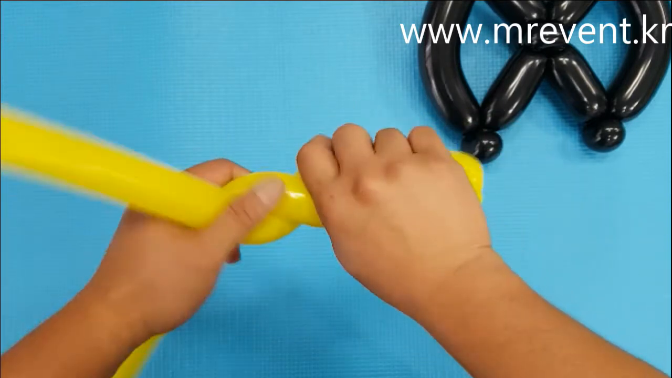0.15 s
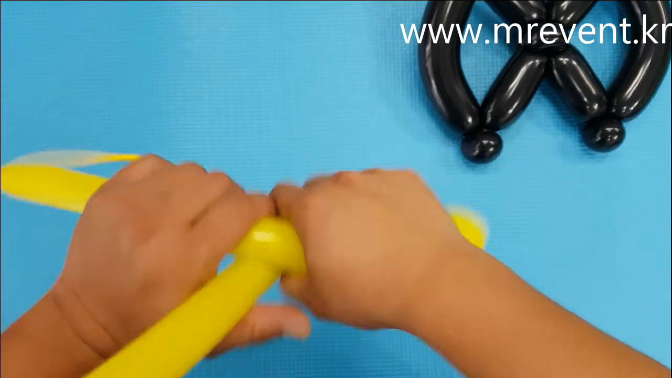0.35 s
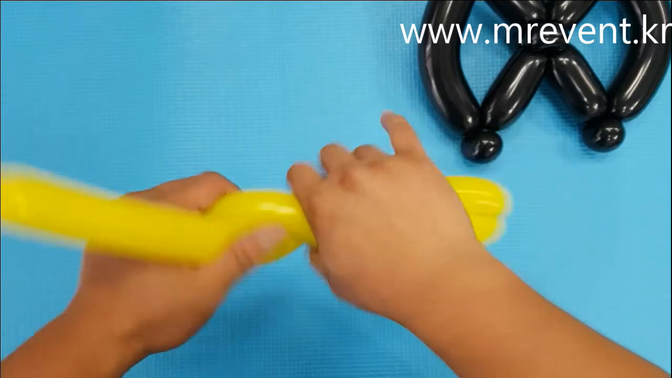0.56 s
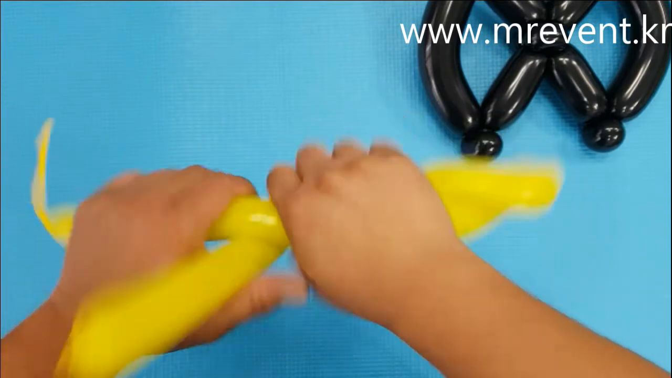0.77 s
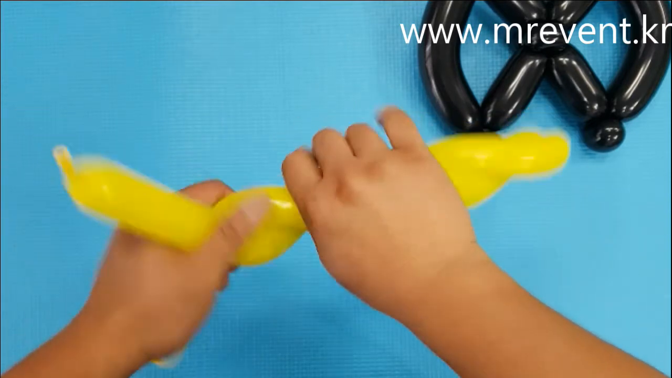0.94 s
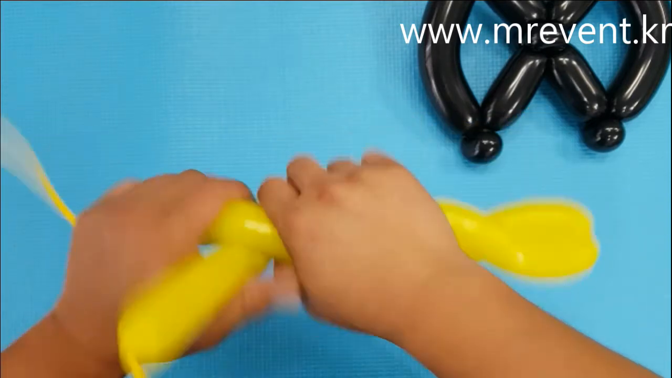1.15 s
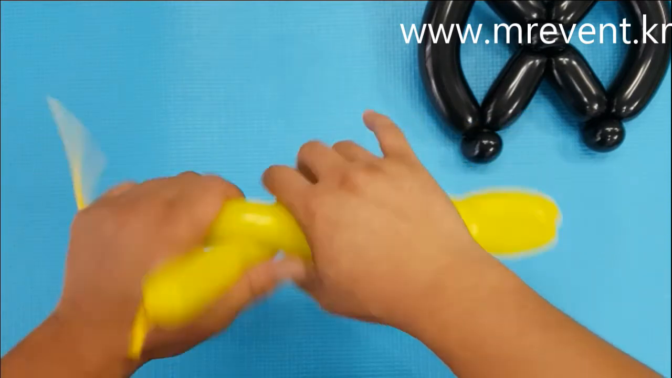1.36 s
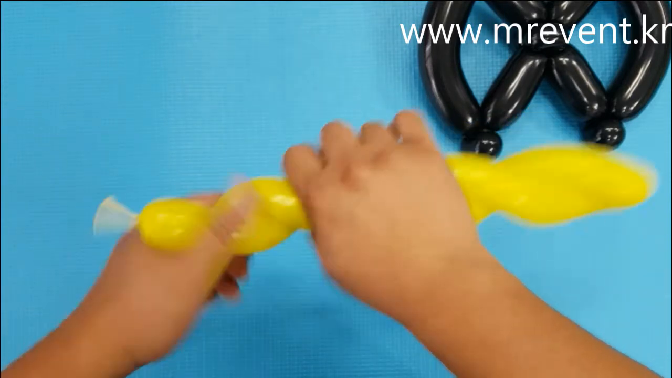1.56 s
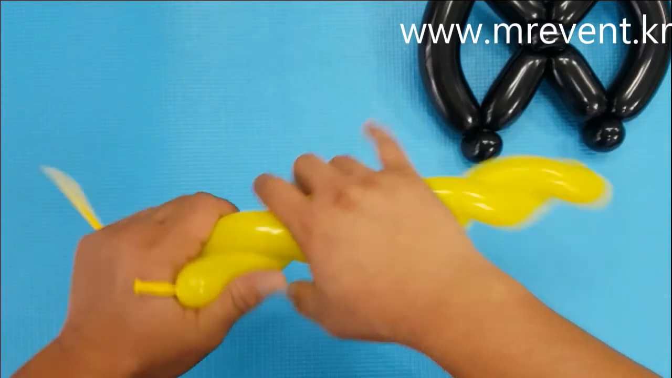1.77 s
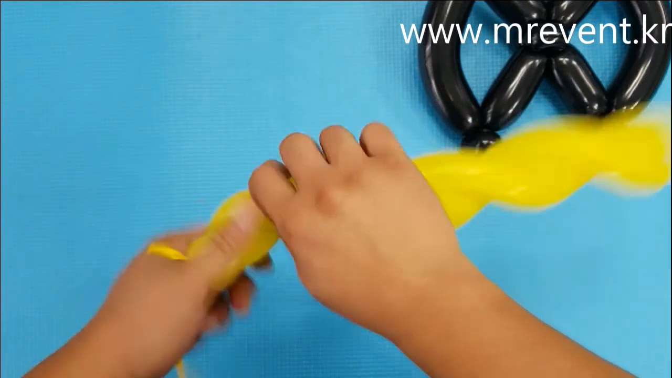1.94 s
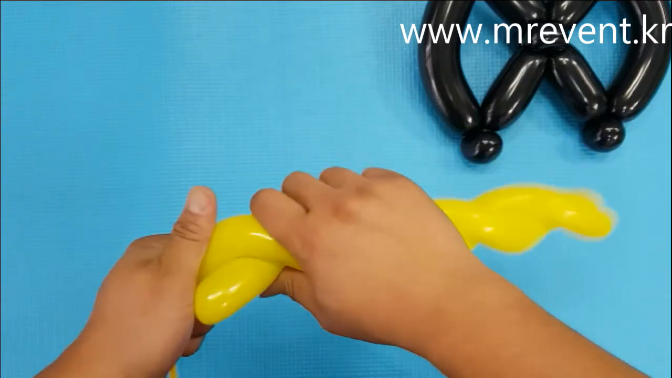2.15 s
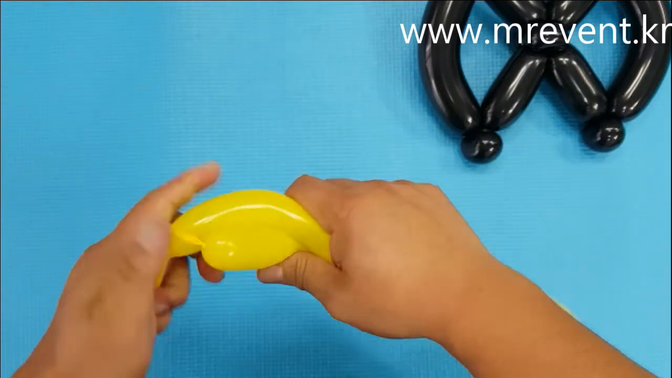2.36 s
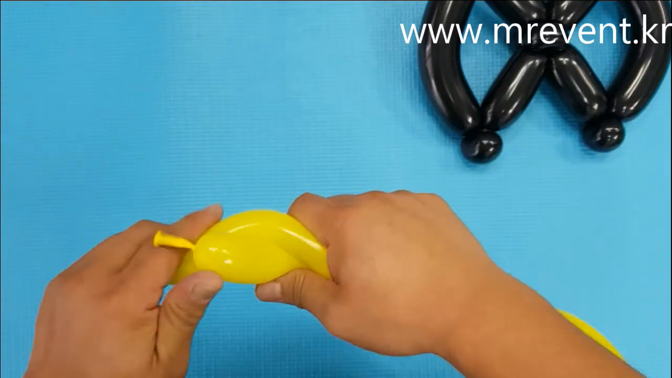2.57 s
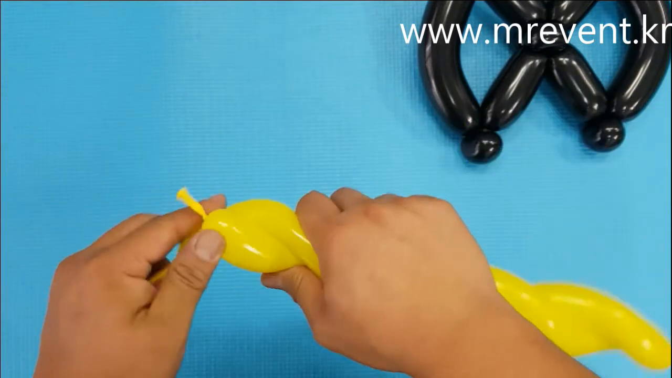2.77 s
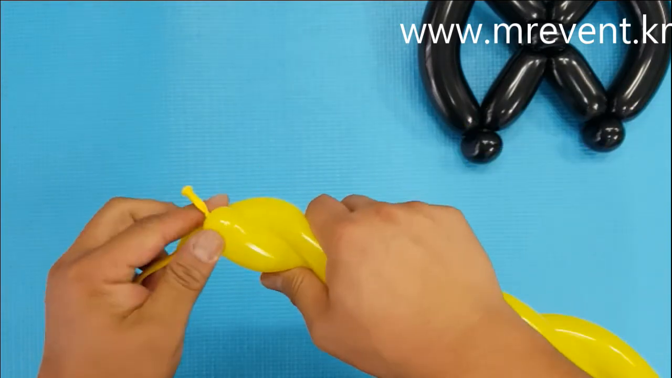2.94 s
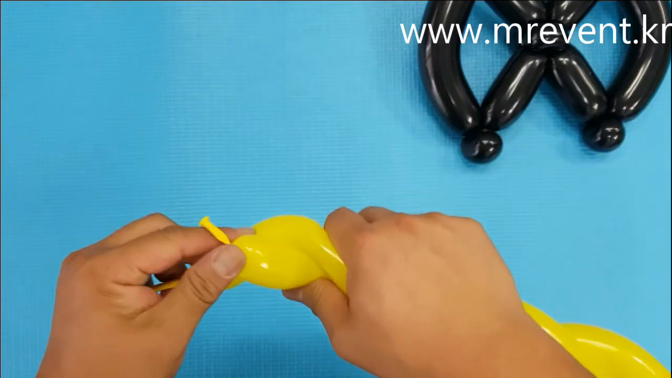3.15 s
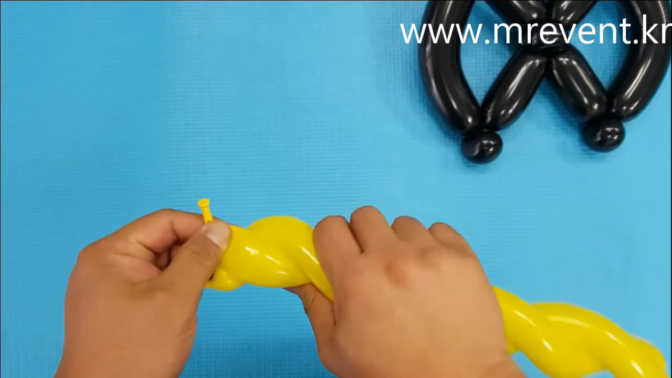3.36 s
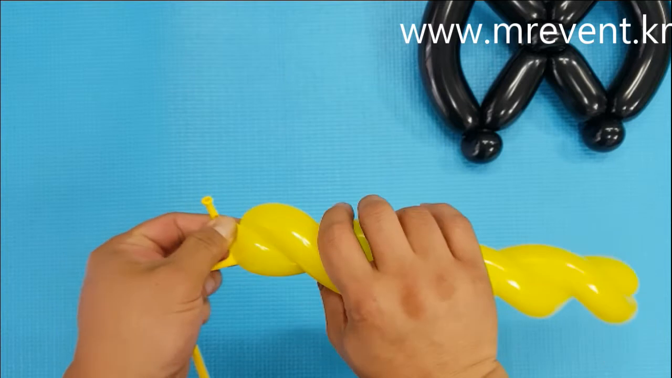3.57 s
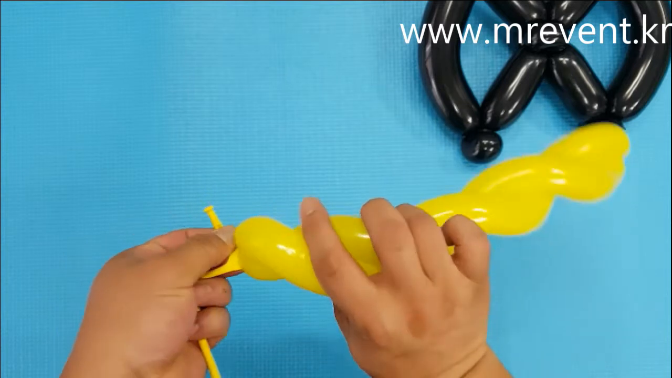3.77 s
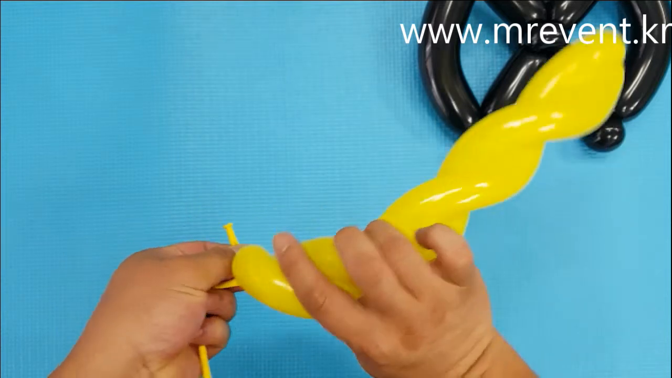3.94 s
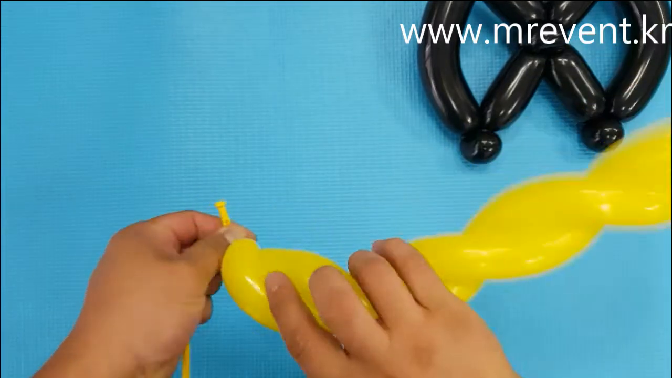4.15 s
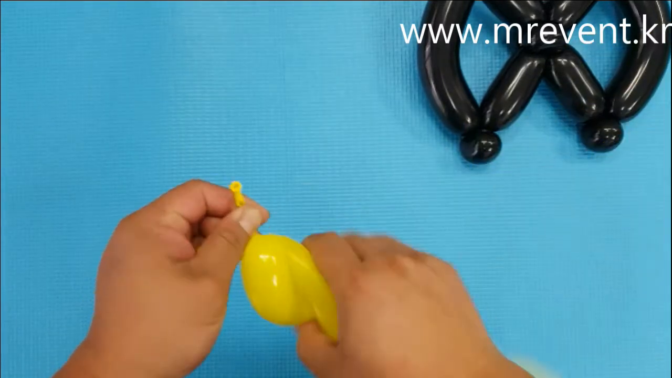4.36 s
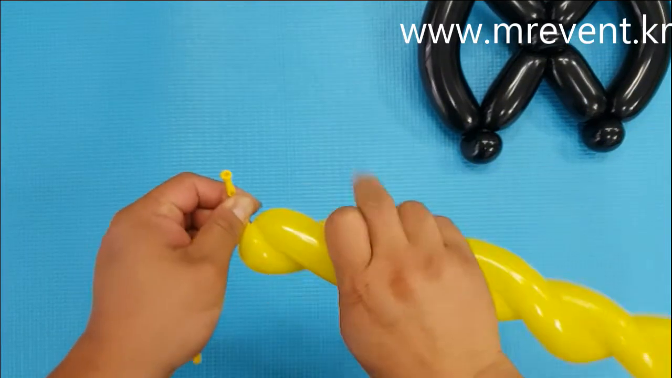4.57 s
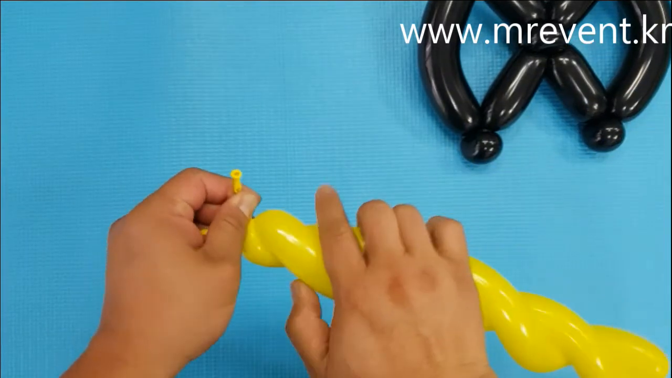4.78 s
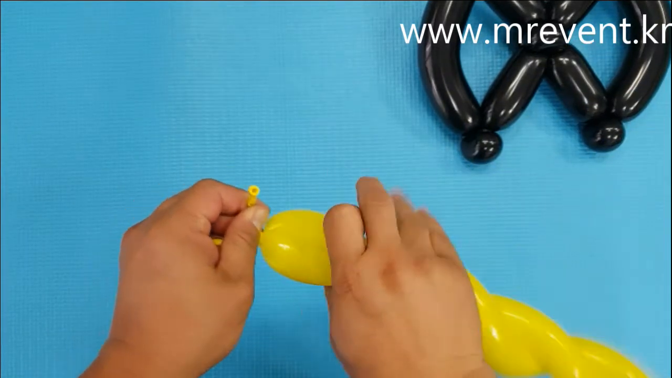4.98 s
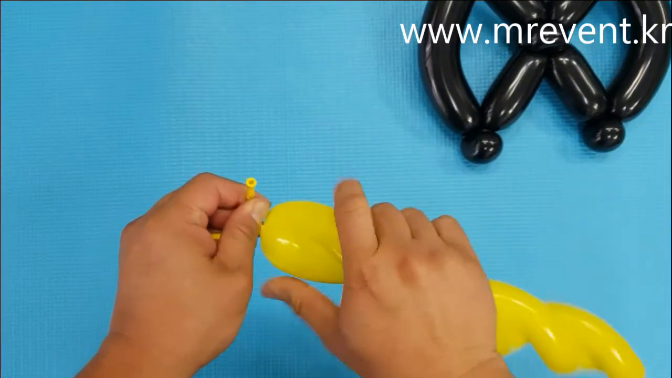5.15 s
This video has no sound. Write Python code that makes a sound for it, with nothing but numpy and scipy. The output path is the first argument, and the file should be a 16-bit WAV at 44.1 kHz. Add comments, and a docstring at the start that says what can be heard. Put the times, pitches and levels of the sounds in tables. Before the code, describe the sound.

A busy run of rubbery creaks, snaps and very short squeals opens the sound as a balloon is twisted against itself. Fingers slide and fumble softly between the twists. The second half is sparser and quieter, with gentle strokes on the latex, a few ticks and a brief stuttering creak. The microphone is close, and the room is nearly dry, with a faint low hum.

```python
"""A long latex balloon, twisted round itself by two hands, close to a stereo microphone in a quiet room.
The skin sticks and slips: single slips tick and crack, slow runs of them ratchet, fast runs creak,
and when they lock into step they squeal. Between twists the fingers slide and fumble, and the air
in the tube booms when let go. Behind it lie a short room tail, room tone and mains hum."""
import sys
import numpy as np
from scipy import signal
from scipy.fft import rfft, irfft, next_fast_len
from scipy.io import wavfile

SR = 44100
rng = np.random.default_rng(int(sys.argv[2]) if len(sys.argv) > 2 else 0)


def int16_out(signal):
    """Quantize to a 16-bit WAV file."""
    q = np.round(np.clip(np.atleast_2d(signal).T, -1, 1) * 32767)
    wavfile.write(sys.argv[1], SR, q.astype(np.int16))


N = 230025
TIME = np.arange(N) / SR

# Noise colours. Each row: frequency in Hz, relative level in dB.
ROOM_COLOUR = [(24, 1), (40, -7), (100, -5), (200, -7.5), (1500, -26), (5000, -44), (16000, -48)]
KNOCK_COLOUR = [(90, 0), (170, -2.5), (270, -1), (430, 3), (700, -11), (1200, -11.5)]
RUB_COLOUR = [(250, -48), (650, -3), (950, 4.5), (1300, -3.5), (1750, 0), (2300, -11), (3200, -22)]
SKIN_COLOUR = [(150, -42), (280, 2.5), (550, -6), (830, 9.5), (1400, -9.5), (1750, 4.5), (2300, -4.5),
               (3200, -54)]
CRACK_COLOUR = [(1400, -3), (2300, 4.5), (3200, -0.5), (4500, -6), (7000, -8.5), (9200, -15.5),
                (11000, -12), (16000, -13.5)]
# How alike left and right are at the microphone. Each row: frequency in Hz, correlation.
STEREO_LIKENESS = [(300, 0.94), (1000, 0.92), (2000, 0.67), (4000, 0.41), (8000, 0.041), (16000, 0)]
# Air booming in the tube. Each row: start in seconds, level in dB, pitch in Hz, 60 dB decay in seconds.
AIR_BOOMS = [(0.625, -18, 220, 0.086), (1.004, -21, 202, 0.099), (1.75, -25.5, 186, 0.1)]
# Fingers shifting their grip. Each row: time in seconds, relative level in dB.
GRIP_LEVELS = [(0.0, -38), (0.42, -43), (1.13, -40.5), (1.58, -57), (2.09, -49), (3.72, -52), (4.0, -33),
               (4.37, -43.5), (4.85, -38), (5.22, -52)]
# Fingers sliding on the skin. Each row: time in seconds, relative rub and hiss levels in dB.
SLIDE_LEVELS = [(0.0, -28.5, -36.5), (0.09, -23, -32), (0.33, -51, -47.5), (0.62, -49, -39.5),
                (0.74, -34, -51.5), (1.2, -48, -42.5), (1.38, -43.5, -48.5), (1.95, -47.5, -47),
                (2.15, -35.5, -40), (2.41, -42, -44.5), (2.56, -39, -42.5), (2.8, -43, -46),
                (3.22, -47, -56), (3.56, -38.5, -44.5), (3.79, -39, -55), (3.97, -30.5, -39.5),
                (4.21, -46.5, -46.5), (4.43, -46.5, -52.5), (4.77, -40, -39), (5.22, -42, -50.5)]
# Soft finger strokes. Each row: middle and length in seconds, level in dB.
FINGER_STROKES = [(0.38, 0.041, -32), (.565, 0.075, -39), (0.763, 0.08, -31.5), (1.184, 0.12, -27),
                  (2.262, 0.096, -26.5), (2.416, 0.051, -26), (2.77, 0.059, -30), (3.415, 0.2, -36),
                  (3.676, 0.034, -36.5), (3.809, 0.13, -32.5), (4.46, 0.03, -33.5), (4.532, 0.056, -36),
                  (4.676, 0.08, -28), (4.97, 0.02, -28.5), (5.121, 0.05, -35.5)]
# Squeals. Each row: start and end in seconds, first and last pitch in Hz, bend (under 1 glides early,
# over 1 late), first and last level in dB, roughness from 0 to 1, overtone lift in dB.
SKIN_SQUEALS = [(0.036, 0.05, 1080, 1200, 0.93, -12.5, -14, 0.52, 3),
                (.208, 0.213, 1660, 1600, 1, -23, -9.5, 0.1, -4),
                (0.307, .342, 345, 378, 2.6, -17.5, -16.5, 0.11, -3.5),
                (.820, 0.867, 882, 1245, 0.41, -12.5, -19.5, 0.06, 5.5),
                (1.195, 1.212, 1317, 1033, 0.83, -10.5, -15.5, 0.15, -1),
                (1.555, 1.610, 1155, 1608, 2.96, -12.5, -11, 0.17, 0),
                (1.936, 1.955, 1483, 1515, 0.72, -15, -4.5, 0.23, 3.5),
                (1.955, 1.995, 840, 620, 2.04, -15, -19, 0, -23),
                (2.330, 2.368, 861, 908, 1.47, -24.5, -29, 0.13, 10),
                (2.365, 2.386, 898, 864, 1.55, -14.5, -16.5, 0.29, 3.5),
                (2.539, 2.587, 332.8, 403, 1.24, -29, -36, 0.17, 11),
                (4.756, 4.767, 424, 357, 1.5, -11, -12.5, 0.57, -11)]
# A squeal's overtones. Each row: frequency in Hz, relative level in dB.
SQUEAL_OVERTONES = [(700, -12), (1200, -7), (2200, -14.5), (3400, -17.5), (5000, -24), (9000, -31),
                    (15000, -34)]
# One creak for each push of the hands. Each row: start and end in seconds, level in dB, pitch in Hz.
SKIN_CREAKS = [(0.027, 0.161, -19.5, 1275), (0.171, 0.241, -28.5, 1240), (0.4, 0.423, -27.5, 1140),
               (.508, 0.539, -25.5, 1100), (0.591, 0.601, -24, 1200), (0.624, 0.635, -24.5, 1720),
               (0.895, 0.925, -21, 1110), (0.93, 0.987, -25.5, 1220), (1.192, 1.223, -21, 1210),
               (1.244, 1.281, -15.5, 1270), (1.282, 1.35, -27, 1290), (1.374, 1.384, -25.5, 1340),
               (1.956, 2.018, -17, 1290), (2.012, 2.068, -22.5, 1250), (2.155, 2.172, -24.5, 1000),
               (2.294, 2.369, -23, 985), (2.543, 2.573, -22.5, 1420), (2.599, 2.626, -27.5, 880),
               (3.984, 4.048, -28, 1422), (4.088, 4.114, -27, 1440)]
# Slow stick-slip. Each row: start and end in seconds, first and last rate in ticks per second,
# relative ring and crack levels in dB.
SKIN_RATCHETS = [(2.216, 2.261, 92, 165, -22, -16), (2.859, 2.924, 113, 102, -39.5, -34.5),
                 (3.009, 3.038, 79, 69, -25.5, -25.5), (3.865, 3.98, 68, 65, -17, -25.5)]
# The loudest single slips. Each row: start in seconds, relative ring and crack levels in dB.
LONE_SLIPS = [(0.006, -18, -24), (0.083, -2.5, -15), (0.1, -2, -19), (0.155, -5, -20), (0.412, -7, -18.5),
              (0.626, -16.5, -25), (0.802, -4, -18.5), (0.901, -13, -15.5), (0.951, -8, -20.5),
              (1.008, -8.5, -17.5), (1.195, -13, -19.5), (1.277, -15, -11.5), (1.345, -8, -19.5),
              (1.666, -11, -24), (1.749, -17, -20.5), (2.031, -8, -30), (2.2, -34, -23),
              (2.267, -17, -18.5), (2.945, -17.5, -27), (3.142, -19.5, -36.5), (4.022, -14, -38),
              (4.087, -23, -31), (4.292, -27.5, -25), (4.677, -11.5, -30.5), (4.757, -4, -29),
              (4.884, -21.5, -30.5)]

RING_SPREAD = 0.11  # spread of log pitch: each slip finds the skin at a slightly different tension
LEFT_RIGHT = np.array([[1], [-1]])


def from_db(db):
    return 10 ** (np.asarray(db) / 20)


def unit_rms(x):
    return x / np.sqrt(np.mean(x ** 2) + 1e-20)


def at_hz(points, hz):
    """A table read on a log-frequency axis."""
    knots, values = np.transpose(points)
    return np.interp(np.log(hz + 1), np.log(knots), values)


def drift(per_s):
    """A random wander of rms 1 that turns about per_s times a second."""
    knots = rng.standard_normal(N // 8)
    return unit_rms(np.interp(TIME * per_s, np.arange(len(knots)), knots))


def noise(colour):
    """Stereo noise of rms 1 that falls away outside its colour; left and right part in the treble."""
    size = next_fast_len(N)
    hz = np.arange(size // 2 + 1) * SR / size + 1e-3
    mid, side = rfft(rng.standard_normal((2, size)))
    alike = at_hz(STEREO_LIKENESS, hz)
    stereo = np.sqrt(1 + alike) * mid + np.sqrt(1 - alike) * side * LEFT_RIGHT
    roll_off = (1 + (colour[0][0] / hz) ** 2) * (1 + (hz / colour[-1][0] / 2) ** 4)
    return unit_rms(irfft(from_db(at_hz(colour, hz)) / roll_off * stereo, size)[:, :N])


def add(out, start_s, sound):
    i = int(np.clip(start_s * SR, 0, N - 1))
    out[..., i:i + sound.shape[-1]] += sound[..., :N - i]


def background():
    """The quiet room: low room tone and a slightly wavering mains hum."""
    room_tone = from_db(-47) * noise(ROOM_COLOUR)
    hum = from_db(-44 + 0.53 * drift(6.6)) * np.sin(2 * np.pi * 120 * TIME)
    return room_tone + hum


def room(direct, t60_s, wet_db):
    """A short diffuse tail from the table and the walls reaches the microphone 3 ms late."""
    t = TIME[:SR // 2]
    diffuse = noise([(100, -4.5), (1500, -3.1), (5000, -0.9), (16000, -1)])[:, :len(t)]
    tail = unit_rms(diffuse * from_db(-60 * t / t60_s) * (t > 0.003)) / np.sqrt(len(t))
    return direct + from_db(wet_db) * signal.fftconvolve(direct, tail, axes=1)[:, :N]


def slips(times, ring_db, crack_db, pitch_hz, swell_s, crack_s, spread):
    """Each slip rings the skin and cracks. The motion holds left, right, ring power and crack power."""
    motion, t = np.zeros((4, N)), TIME[:int(0.015 * SR)]
    swell, snap = t / swell_s * np.exp(1 - t / swell_s), np.exp(-t / crack_s)
    chance = rng.standard_normal((len(times), 3))
    for start, ring, crack, (detune, side, sign) in zip(times, from_db(ring_db), from_db(crack_db), chance):
        phase = 2 * np.pi * pitch_hz * np.exp(spread * detune) * t + 0.3 * side * LEFT_RIGHT
        tone = np.sqrt(2) * np.sign(sign) * ring * swell * np.sin(phase)
        add(motion, start, np.vstack([tone, (ring * swell) ** 2, (crack * snap) ** 2]))
    return motion


def slip_run(start, end, per_s, uneven_db, **slip_shape):
    """Stress builds and lets go at uneven intervals; ring and crack each have mean power 1."""
    gap, size, sharpness = rng.standard_normal((N // 40, 3)).T
    times = np.cumsum(np.exp(0.5 * gap)) / per_s
    times = times - times[0] + start
    times = times[times < end]
    size_db = uneven_db * np.clip(size[:len(times)], -2, 1.5)
    run = slips(times, size_db, size_db + 2 * sharpness[:len(times)], **slip_shape)
    ring, crack = run[2:].sum(axis=1) / ((end - start) * SR)
    return run / np.array([[np.sqrt(ring)], [np.sqrt(ring)], [ring], [crack]])


def pressed(run, ring_db, crack_db):
    """A run of slips brought to its strength."""
    ring, crack = from_db(ring_db), from_db(crack_db)
    return np.array([run[0] * ring, run[1] * ring, run[2] * ring ** 2, run[3] * crack ** 2])


def skin(motion, colour, scatter):
    """Part of each ring scatters into the many modes of the skin; the crack is broad treble."""
    tone, ring_power, crack_power = motion[:2], motion[2], motion[3]
    body = np.sqrt(1 - scatter) * tone + np.sqrt(scatter * ring_power) * noise(colour)
    return body + np.sqrt(crack_power) * noise(CRACK_COLOUR) * from_db(0.4 * LEFT_RIGHT)


def booms():
    """A sudden release sets the enclosed air ringing; it swells over the first cycle."""
    out, t = np.zeros(N), TIME[:SR // 2]
    for start, db, hz, t60_s in AIR_BOOMS:
        envelope = from_db(db - 60 * t / t60_s) * np.minimum(hz * t, 1)
        add(out, start, envelope * np.sin(2 * np.pi * hz * t))
    return out


def fumbling():
    """Fingers shift their grip with soft, dull knocks."""
    grip_db = np.interp(TIME, *np.transpose(GRIP_LEVELS))
    return from_db(grip_db - 1.5 + 5.5 * drift(70)) * noise(KNOCK_COLOUR)


def sliding(fade_db_per_s=238):
    """Light contact gives a patter of tiny slips; it also rises with each creak and trails after it."""
    times, *levels = np.transpose(SLIDE_LEVELS)
    rub_db, hiss_db = [np.interp(TIME, times, db) for db in levels]
    trails = [np.where(TIME < start, -np.inf, db - fade_db_per_s * np.maximum(TIME - end, 0))
              for start, end, db, _ in SKIN_CREAKS]
    trail_db = np.max(trails, axis=0) - 11.5
    run = slip_run(0, N / SR, per_s=170, uneven_db=4,
                   pitch_hz=1100, swell_s=0.0017, crack_s=0.018, spread=RING_SPREAD)
    motion = pressed(run, np.maximum(rub_db - 1, trail_db), np.maximum(hiss_db + 1.5, trail_db - 1.5))
    return skin(motion, RUB_COLOUR, scatter=0.9)


def strokes():
    """A finger speeds up and slows again; its tiny slips ring the skin softly near one pitch."""
    speed = sum(from_db(db) * np.cos(np.pi * np.clip((TIME - middle) / length, -0.5, 0.5))
                for middle, length, db in FINGER_STROKES)
    level_db = 20 * np.log10(speed + 1e-9)
    run = slip_run(0, N / SR, per_s=260, uneven_db=4,
                   pitch_hz=1080, swell_s=0.00086, crack_s=0.0033, spread=0.14)
    return skin(pressed(run, level_db, level_db - 5), RUB_COLOUR, scatter=0.51)


def squeals(lock_cycles=1.73, release_share=0.14):
    """Slips locked to one period: a gliding tone with unsteady overtones and a rasp once a cycle."""
    out, jitter, flutter, rasp = np.zeros((2, N)), drift(900), drift(450), noise(CRACK_COLOUR)
    wobbles = [drift(380) for _ in range(12)]
    for start, end, first_hz, last_hz, bend, first_db, last_db, rough, lift_db in SKIN_SQUEALS:
        now = (TIME >= start) & (TIME < end)
        progress = (TIME[now] - start) / (end - start)
        hz = first_hz + (last_hz - first_hz) * progress ** bend
        cycles = np.cumsum(hz * (1 + 0.17 * rough * jitter[now])) / SR
        phase = 2 * np.pi * cycles
        fade = np.clip(np.minimum(cycles / lock_cycles, (1 - progress) / release_share), 0, 1)
        level_db = first_db + (last_db - first_db) * progress + 5.3 * rough * flutter[now]
        level = np.sqrt(2) * fade * from_db(level_db)
        out[:, now] += level * from_db(lift_db / 2 - 19) * (1 + np.cos(phase)) * rasp[:, now]
        for k, wobble in enumerate(wobbles, 1):
            overtone_db = lift_db + at_hz(SQUEAL_OVERTONES, k * hz.mean()) + 2 * wobble[now]
            gain = 1 if k == 1 else from_db(overtone_db)
            # high overtones reach the two sides of the microphone in different phase
            apart = np.arccos(at_hz(STEREO_LIKENESS, k * hz.mean())) / 2 * LEFT_RIGHT
            out[:, now] += gain * level * np.sin(k * phase + rng.uniform(0, 2 * np.pi) + apart)
    return out


def creaks():
    """Latex dragged over latex under a tight grip slips in dense runs."""
    motion = np.zeros((4, N))
    for start, end, db, hz in SKIN_CREAKS:
        run = slip_run(start, end, per_s=370, uneven_db=1.5,
                       pitch_hz=hz, swell_s=0.00089, crack_s=0.0022, spread=0.17)
        crack_db = -28.5 + 0.93 * (db + 27.5)  # the crack grows more slowly than the ring
        motion += pressed(run, db, crack_db)
    return from_db(-0.16) * skin(motion, SKIN_COLOUR, scatter=0.37)


def ratchet_ticks(jitter_s=0.0006, uneven_db=2.5):
    """Ticks follow the speed of the twist, which changes evenly through a ratchet."""
    ticks = []
    for start, end, first_per_s, last_per_s, ring_db, crack_db in SKIN_RATCHETS:
        t = TIME[(TIME >= start) & (TIME < end)]
        slipped = np.cumsum(np.linspace(first_per_s, last_per_s, len(t))) / SR
        times = np.interp(np.arange(np.ceil(slipped[-1])), slipped, t)
        chance = rng.standard_normal((32, 2)) * [jitter_s, uneven_db]
        ticks += [(s + late, ring_db + size, crack_db + size) for s, (late, size) in zip(times, chance)]
    return ticks


def single_slips():
    """Big slips and ratchet ticks, heard one by one. Sharp ones set a small taut patch chirping high."""
    lone = [(start, ring_db - 5.5, crack_db + 0.5) for start, ring_db, crack_db in LONE_SLIPS]
    times, ring_db, crack_db = np.transpose(lone + ratchet_ticks())
    chirp_share = 1 / (1 + from_db(2 * (ring_db - crack_db + 6.5)))
    chirp_db, spray_db = crack_db + 10 * np.log10([chirp_share, np.clip(1 - chirp_share, 0.05, 1)])
    motion = slips(times, ring_db, spray_db + 5.5,
                   pitch_hz=1200, swell_s=0.00091, crack_s=0.002, spread=RING_SPREAD)
    chirp = slips(times, chirp_db + 0.5, chirp_db,
                  pitch_hz=3136, swell_s=0.00089, crack_s=0.001, spread=RING_SPREAD / 2)
    return skin(motion, SKIN_COLOUR, scatter=0.69) + chirp[:2]


def scene():
    """The balloon close up, its thin tube radiating little bass, with the room behind it."""
    balloon = single_slips() + creaks() + squeals() + strokes() + sliding() + fumbling() + booms()
    low_cut = signal.butter(2, 120, "high", fs=SR, output="sos")
    return room(signal.sosfilt(low_cut, balloon), t60_s=0.14, wet_db=-6.5) + background()


def record(dry):
    """The highest peaks are rounded and the top is cut."""
    high_cut = signal.ellip(12, 0.1, 95, 16050, fs=SR, output="sos")
    return signal.sosfilt(high_cut, 1.106 * np.tanh(dry / 1.101))


dry = scene()
out = record(dry)
int16_out(out)
```